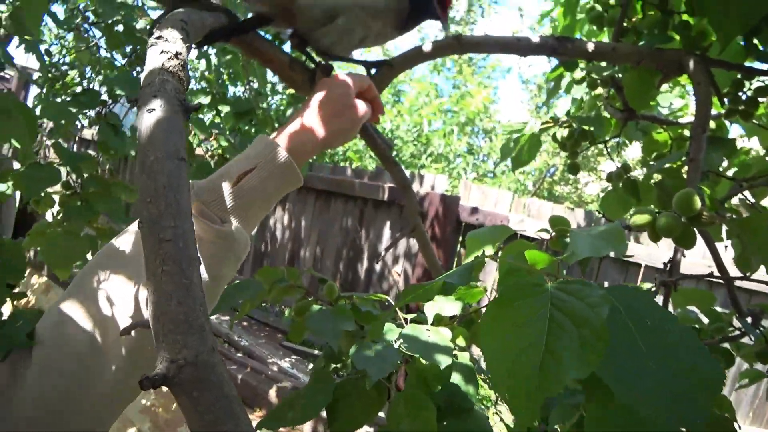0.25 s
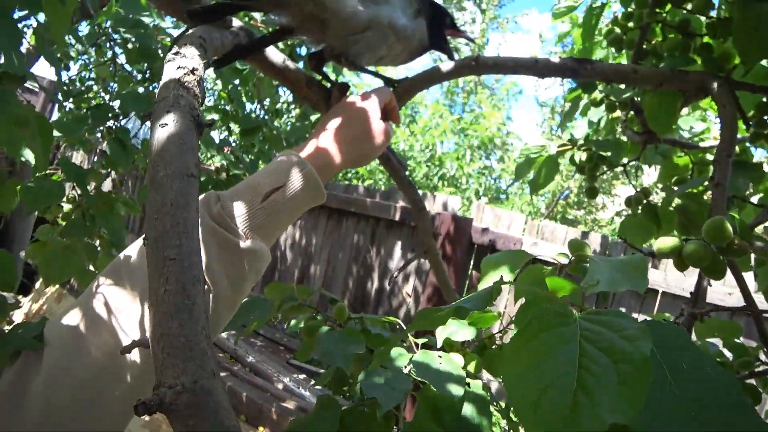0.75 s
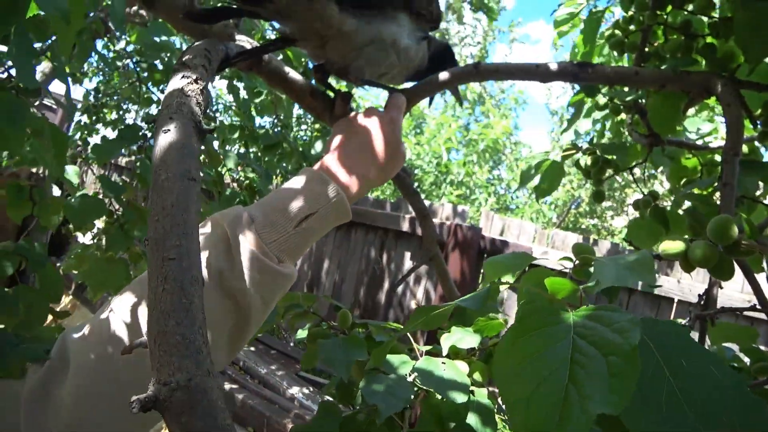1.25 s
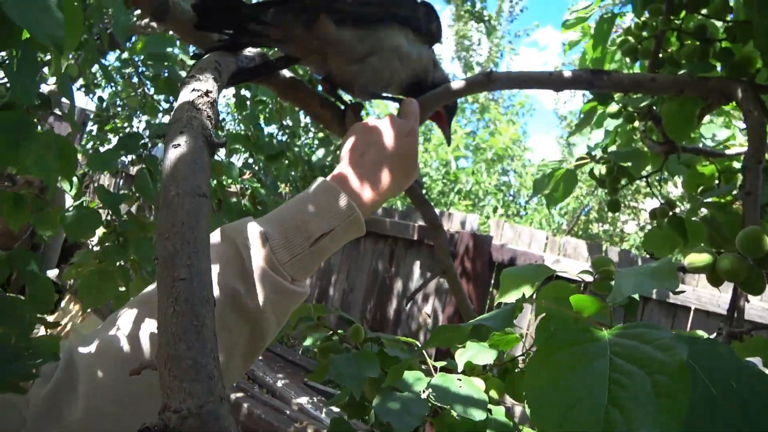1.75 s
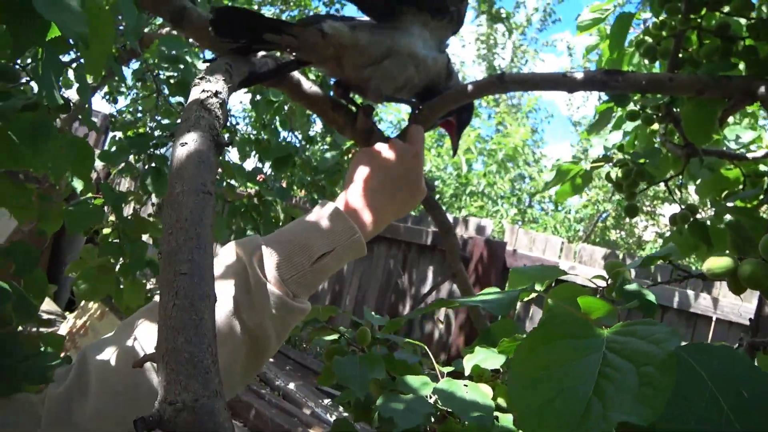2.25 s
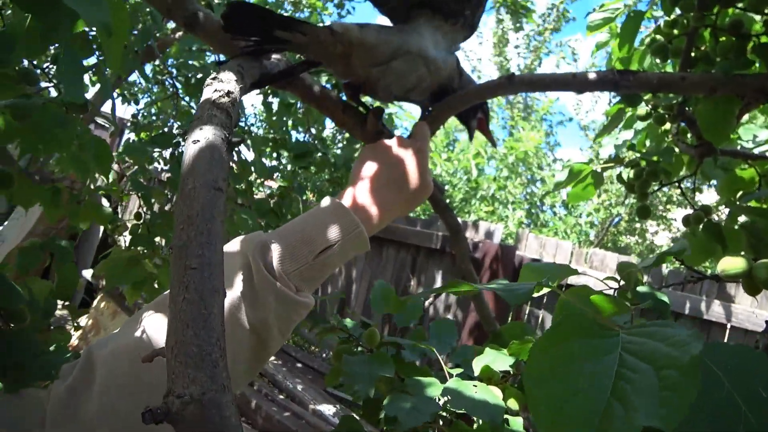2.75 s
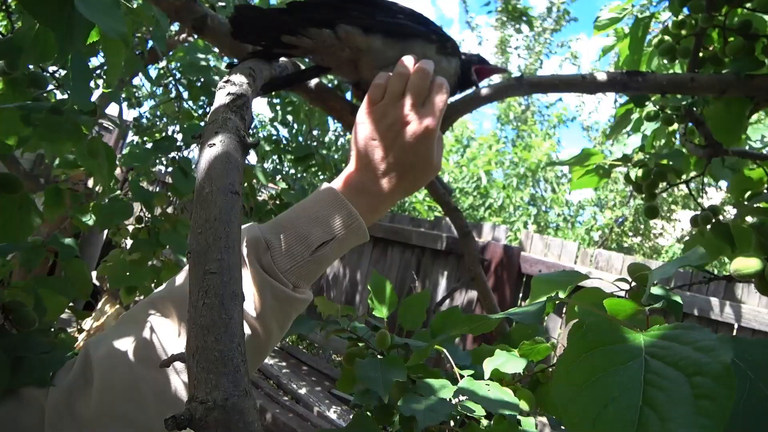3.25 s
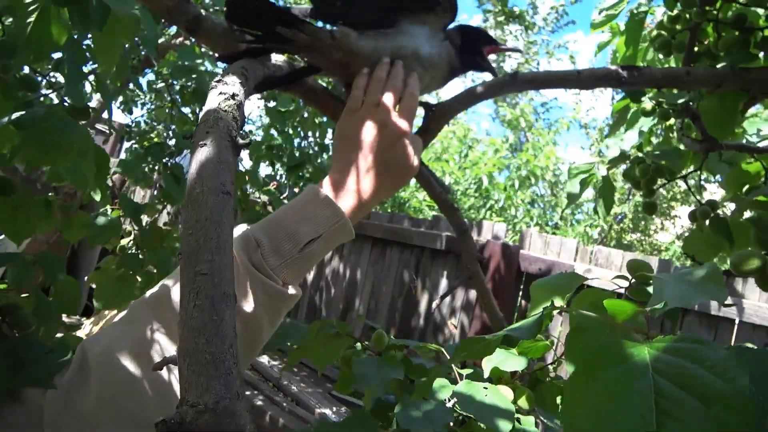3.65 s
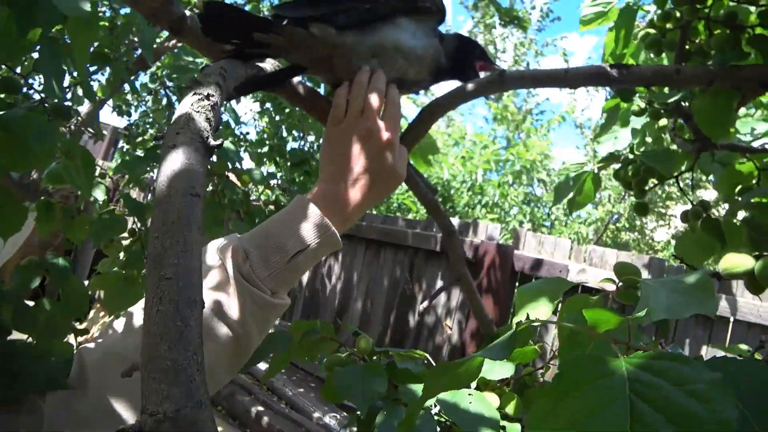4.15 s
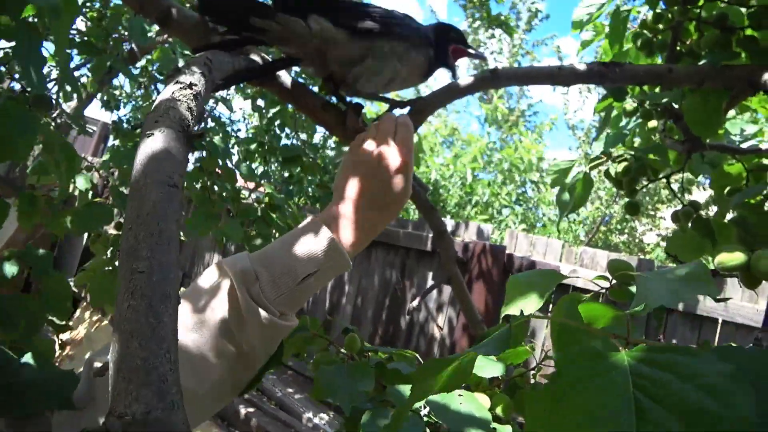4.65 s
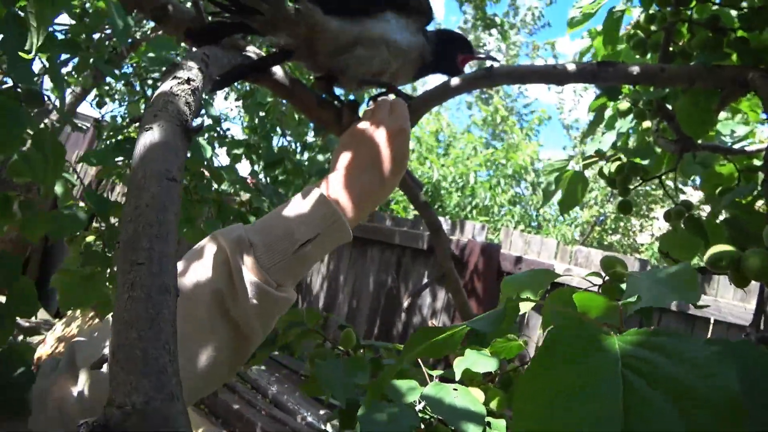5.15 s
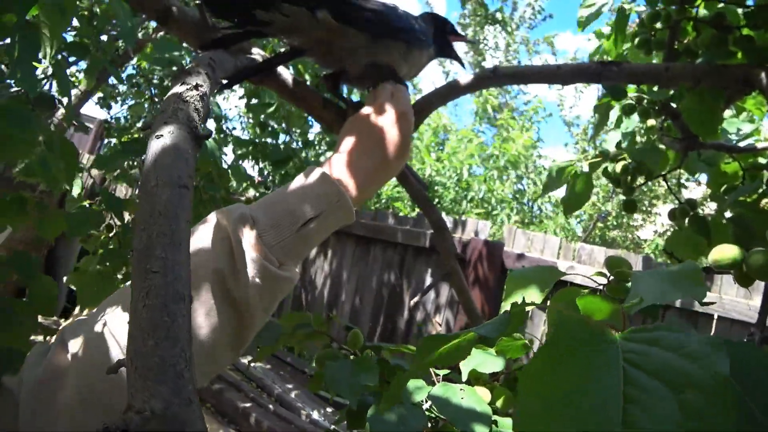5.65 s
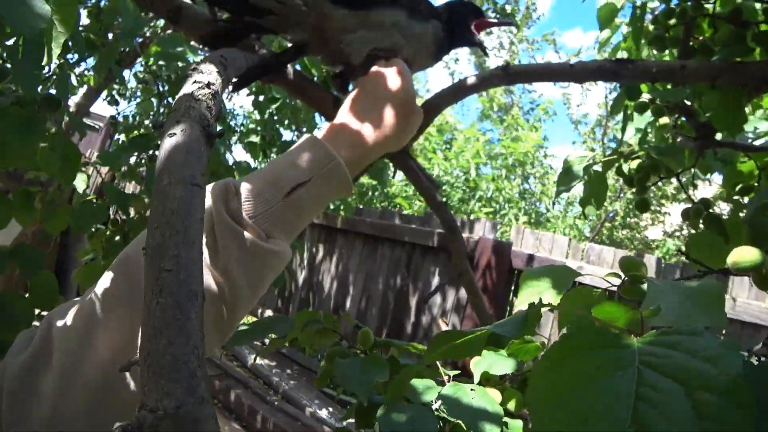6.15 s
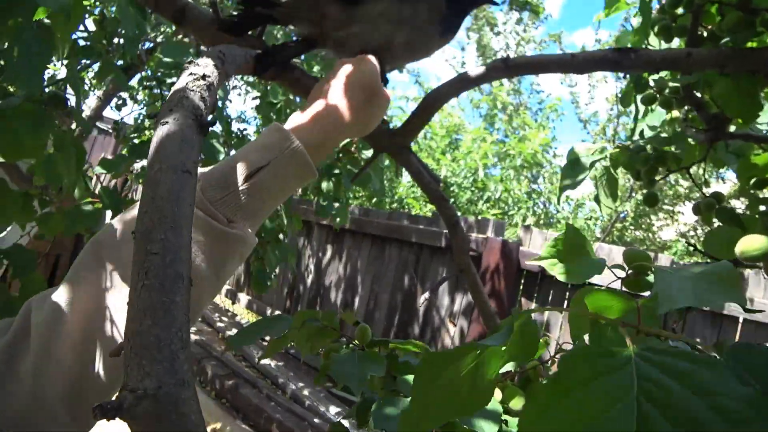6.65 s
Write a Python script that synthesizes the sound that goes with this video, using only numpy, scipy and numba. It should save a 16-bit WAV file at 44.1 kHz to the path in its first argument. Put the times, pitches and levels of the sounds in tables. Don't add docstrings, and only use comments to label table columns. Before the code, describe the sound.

A quiet leafy yard with a low distant town hum and faint leaf hiss; the tail of an earlier caw still rings at the start, with small twig ticks. A young crow about two metres away, slightly right, caws loudly at roughly 0.2, 1.0, 1.8, 2.6, 3.4, 4.2, 5.0 and 6.0 seconds, each lasting about 0.4 seconds. Every caw is harsh, rough and buzzing, with a quick onset, a held nasal rasp around 400 Hz and bright upper tones, then a brief pitch sag and crackling stop. Brightness varies from call to call. Short echoes from branches and fence follow, and the background dips under each caw. Leaves rustle near 0.8 to 1.0 and 1.5 seconds, with a stronger wind bump at 1.5. After the last caw ends at 6.4, quick wind puffs and a sharper cluster of rustling twigs and leaves run from 6.6 to the end, near 7.

```python
import sys
import numpy as np
from scipy import signal
from scipy.fft import rfft, irfft
from scipy.io import wavfile
from scipy.ndimage import uniform_filter1d
from numba import njit

SR = 44100
rng = np.random.default_rng(int(sys.argv[2]) if len(sys.argv) > 2 else 0)


def pcm_store(signal):
    levels = np.round(np.clip(np.atleast_2d(signal), -1, 1) * 32767)
    wavfile.write(sys.argv[1], SR, levels.astype(np.int16).T)


def how_loud(loudness_db):
    steps = np.asarray(loudness_db, float) / 20
    return 10 ** steps


N = 304528
T = np.arange(N) / SR

# (start [s], end [s])
CAW_SPANS = [
    (.235, .64),
    (1.0264, 1.435),
    (1.8362, 2.3),
    (2.6391, 3.035),
    (3.4086, 3.835),
    (4.1952, 4.615),
    (5.041, 5.485),
    (5.9896, 6.4),
]
# (release begins [s], held pulse rate [Hz], last pulse rate [Hz], sag time [s])
CAW_PITCHES = [(.598, 414.3, 324.8, 0.087), (1.395, 408.1, 309.9, 0.079), (2.264, 402.7, 338.1, 0.068),
               (2.993, 409, 310.5, 0.056), (3.797, 407, 330.1, .055), (4.572, 407, 325, .1),
               (5.447, 407.1, 336.6, 0.078), (6.36, 396.9, 304, 0.083)]
EFFORT = [(-19.5, -24.5, -18.5, -19, -19.5), (-18.5, -18.5, -18.5, -20.5, -21.5),
          (-17, -22, -21.5, -22.5, -21.5), (-18, -20.5, -20, -19.5, -19.5), (-19.5, -22.5, -20, -18, -19.5),
          (-18, -18, -18.5, -19, -20.5), (-18, -21, -20, -18.5, -21.5), (-17.5, -19, -19.5, -20, -22)]
GAPE = [(0.24, 0.31, 0.47, 0.63, 0.58), (.02, .08, .5, 1, .92), (0.4, 0.29, 0.33, .42, 0.4),
        (0.1, .02, .04, 0.25, 0.56), (0.11, .1, 0.26, 0.36, 0.35), (0.076, 0.2, 0.48, 0.62, 0.55),
        (0.48, 0.28, 0.35, 0.48, 0.48), (0.13, 0.17, 0.34, 0.55, 0.58)]
FACING = [(10.5, 10.5, 1, 1.5, -1), (-7, -4, -2, -0.5, 3.5), (4.5, 7, 9.5, 10, 8), (2, 3.5, 6, 6.5, 2),
          (7, 8.5, 4, -4.5, 0.5), (-4.5, -2, -3.5, 0.5, -2), (3.5, 1.5, -1, -6, -4),
          (-6, -1.5, 0.5, 4, 6.5)]
# (third resonance [Hz], fourth resonance at onset [Hz], fourth resonance at release [Hz])
NECK = [(6550, 7860, 7830), (6590, 7300, 8180), (6470, 7830, 7980), (6350, 8300, 7980), (6330, 7610, 8270),
        (6527, 8270, 7940), (6460, 7640, 7810), (6380, 7930, 7870)]
PULL = ((.11, .12), (.05, .85))
# (frequency [Hz], level [dB])
CLICK_COLOUR = [(150, -50.5), (260, -10), (420, -2.5), (650, 0.5), (1000, 2), (3000, -2), (6000, 5),
                (11000, 1)]
# (width [Hz], lift [dB])
MOVING_RESONANCES = [(950, 18), (900, 12.5), (1100, 11), (900, 8)]
# (frequency [Hz], width [Hz], lift [dB])
STEADY_RESONANCES = [(1166, 190, 4.6), (1750, 510, 6), (2550, 2400, 5.3), (5760, 970, 3.7),
                     (7130, 340, 9.9), (8980, 2400, 6), (10580, 930, 7.1)]
# (which resonance [index], offset [Hz],
# width [Hz], lift [dB])
MOVING_GAPS = [(2, 720, 140, -9), (3, 1200, 180, -11)]
# (beak shut [Hz], beak wide [Hz])
FIRST_HZ = (1994, 2292)
SECOND_HZ = (3654, 5440)
SPLIT_HZ = (3200, 5500, 8900)
# (level against the bass [dB], share of the facing, extra at onset [dB], extra at release [dB])
BEAM = [(-11.5, 0.083, -13.5, -7), (-6, 0.31, -2.5, -1.5), (-16, 1., -12, -9.5)]
# (frequency [Hz], left minus right [dB])
SIDE_DIFFERENCE = [(150, -.3), (500, -3), (1100, -5), (4000, -6), (8000, -4.5), (11000, -3)]
# (frequency [Hz], time to fade by 60 dB [s])
YARD_FADE = [(500, 0.46), (1100, 0.49), (2100, 0.4), (4200, 0.4), (8000, 0.13)]
# (frequency [Hz], level per Hz [dB])
TOWN_COLOUR = [(15, -31), (25, -12), (239, -11.5), (317, -9.5), (399, -13), (490, -12), (543, -15.5),
               (840, -13), (2280, -25.5), (3630, -24.5), (5900, -26.5), (10600, -33), (11500, -47),
               (15000, -88.5), (22000, -120)]
# (time [s], peak level [dB], rise [s], fall [s])
GUSTS = [
    (.17, -54, 0.072, .04),
    (1.53, -35, .01, 0.073),
    (4.63, -53, .02, 0.032),
    (6.445, -37, 0.016, .015),
    (6.72, -47, 0.0087, .012),
    (6.752, -37, .01, .012),
    (6.8, -43, .02, .06),
]
# (time [s], peak level [dB], rise [s], fall [s])
STIRS = [
    (.15, -46, 0.16, 0.11),
    (.78, -55, 0.06, .08),
    (.99, -45, .03, 0.11),
    (5.93, -68, 0.071, .05),
    (6.47, -52, 0.027, 0.023),
    (6.85, -42, 0.092, .2),
]
# (time [s], peak level [dB], colour [Hz], length [s])
RUSTLES = [(0.059, -34.5, 5030, 0.0093), (0.1494, -31.5, 6380, 0.0032), (0.837, -40, 4110, 0.0096),
           (0.847, -32.5, 6750, 0.018), (0.887, -34, 6400, 0.0098), (0.966, -44, 9620, 0.008),
           (1.456, -34, 5880, 0.008), (1.484, -34, 5080, 0.0069), (1.4994, -44, 5250, 0.0061),
           (1.5994, -55, 4950, 0.0072), (1.6397, -34.5, 4750, 0.0066), (4.7594, -39, 5700, 0.0064),
           (5.624, -36.5, 4101, 0.0085), (5.713, -39, 4630, 0.0087), (6.619, -23.5, 4900, 0.01),
           (6.665, -36.5, 5710, 0.011), (6.721, -36.5, 5350, 0.028), (6.748, -35, 5760, 0.022),
           (6.773, -30, 8480, 0.023), (6.778, -30, 5520, 0.019), (6.877, -34, 6280, 0.0089)]

RATIO_HELD, RATIO_LAST, RATIO_WANDER, SLIP_S = .75, .69, .01, .11
LOCK_HZ, LOCK_PHASE = 3., -.1
ROUGH_ATTACK, ROUGH_HELD, ROUGH_LAST = .5, .22, .5
ATTACK_S, ATTACK_DB, ATTACK_PITCH, ATTACK_GAPE = .012, -2, .83, 0.28
RELEASE_DB_PER_S, RELEASE_DULL_S, STOP_S, COLLAPSE_S = -450, 0.02, 0.029, .045
THIRD_SAG_HZ = 200
TOWN_DB, LEAF_DB = -46.5, -57.5
WIND_DB, WIND_DUCK_DB, WIND_SWELL_DB = -54, -5, 1
DUCK_DB, DUCK_RELEASE_S = -8, .05
TOP_HZ = 11050


def colour(x, points):
    hz, db = np.transpose(points)
    grid_hz = np.arange(1, 1026) * SR / 2048
    log_gain = np.interp(np.log(grid_hz), np.log(hz), db) * np.log(10) / 20
    cepstrum = irfft(log_gain)
    cepstrum[1:1024] *= 2
    cepstrum[1025:] = 0
    return signal.fftconvolve(x, irfft(np.exp(rfft(cepstrum))))[:len(x)]


def unit(x):
    return x / np.sqrt(np.mean(x ** 2))


def walk(rate):
    k = int(SR / rate)
    held = np.repeat(rng.standard_normal(N // k + 1), k)
    return 1.3 * uniform_filter1d(uniform_filter1d(held, k), k)[:N]


def swells(rows):
    total = 0
    for s, db, rise, fall in rows:
        length = np.where(T < s, max(rise, .005), max(fall, .005))
        total = total + how_loud(db) * np.exp(-np.abs(T - s) / length)
    return total


@njit
def band(x, hz, width):
    y, b, l = np.empty(len(x)), 0., 0.
    for i in range(len(x)):
        g, k = np.tan(np.pi * hz[i] / SR), width / hz[i]
        v = (b + g * (x[i] - l)) / (1 + g * (g + k))
        b, l, y[i] = 2 * v - b, l + 2 * g * v, k * v
    return y


def pair(points, alike_hz):
    mid, side = (colour(rng.standard_normal(N), points) for _ in range(2))
    side = signal.sosfilt(signal.butter(1, alike_hz, "high", fs=SR, output="sos"), side)
    return unit(np.array([mid + side, mid - side]))


def town():
    noise, out = pair(TOWN_COLOUR, alike_hz=550), 0
    edges = [110, 180, 300, 700, 1600, 3500, 7000, 12000]
    swell = walk(1.0)
    for lo, hi in zip(edges, edges[1:]):
        part = signal.sosfiltfilt(signal.butter(2, (lo, hi), "band", fs=SR, output="sos"), noise)
        out = out + part * how_loud(.6 * swell + 1.1 * walk(9))
    return unit(out) * how_loud(TOWN_DB - 2.5)


def wind(sounding):
    bumps = pair([(15, 3), (30, -0.5), (72, -2.0), (110, -5.0), (200, -19.5), (400, -30), (900, -54)],
                 alike_hz=610)
    duck_db = WIND_DUCK_DB * uniform_filter1d(sounding, size=2000)
    breeze = how_loud(WIND_DB + WIND_SWELL_DB * walk(6.7) + duck_db)
    return bumps * (breeze + swells(GUSTS)) * how_loud(-1.5 + 1.5 * walk(25))


def leaves():
    grains = how_loud(2.0 * rng.exponential(size=(2, N))) * rng.standard_normal((2, N))
    hiss_colour = [(1500, -10), (4000, -10), (8000, -13.0), (11000, -6.0)]
    hiss = np.array([colour(g, hiss_colour) for g in grains])
    out = unit(hiss) * (how_loud(LEAF_DB) + swells(STIRS)) * how_loud(-5)
    t = T[:4000]
    for s, db, hz, length in RUSTLES:
        mid, side = rng.standard_normal((2, len(t)))
        centre = np.full(len(t), 1. * hz)
        burst = np.array([band(v, centre, 4400.0) for v in (mid + .5 * side, mid - .5 * side)])
        fade = np.minimum(t / .004, 1) * np.exp(-t / max(length, .002))
        burst = how_loud(db - 3) * burst * fade
        i = int(s * SR)
        out[:, i:i + len(t)] += burst[:, :N - i]
    return out


def yard(voice):
    t = T[:SR // 2]
    out = []
    for _ in range(2):
        tail = 0
        for f, t60 in YARD_FADE:
            ring = band(rng.standard_normal(len(t)), np.full(len(t), 1. * f), 0.82 * f)
            tail = tail + ring * how_loud(-60 * t / t60) / np.sqrt(f)
        tail = how_loud(-22.0) * tail * np.minimum(t / 0.028, 1) / np.linalg.norm(tail)
        out.append(signal.fftconvolve(voice, tail)[:N])
    out = np.array(out)
    late = int(.66 * SR)
    out[:, :SR // 4] += how_loud(-2.0) * out[:, late:late + SR // 4]
    return out


def caw(k, t):
    start, _ = CAW_SPANS[k]
    release, held_hz, last_hz, sag_s = CAW_PITCHES[k]
    moments = np.linspace(start, release, 5)
    effort_db, gape, facing_db = (np.interp(t, moments, table[k]) for table in (EFFORT, GAPE, FACING))
    onset = np.exp(-np.maximum(t - start, 0) / ATTACK_S)
    after = np.clip(t - release, 0, .06)
    sag, slip, dull = (np.exp(np.minimum(t - release, .02) / tau) for tau in (sag_s, SLIP_S, RELEASE_DULL_S))
    hz = held_hz * (1 - (1 - ATTACK_PITCH) * onset) - (held_hz - last_hz) * sag
    hz = hz * np.exp(-after / COLLAPSE_S)
    ratio = RATIO_HELD + (RATIO_LAST - RATIO_HELD) * slip
    rough = ROUGH_HELD + (ROUGH_ATTACK - ROUGH_HELD) * onset + (ROUGH_LAST - ROUGH_HELD) * sag
    db = effort_db + ATTACK_DB * onset + RELEASE_DB_PER_S * after - 10 * (after / STOP_S) ** 4
    beams = [level_db + share * facing_db + first_db * onset + last_db * dull
             for level_db, share, first_db, last_db in BEAM]
    gape = gape + ATTACK_GAPE * onset
    third_hz, *fourth_hz = NECK[k]
    throat = [shut + (wide - shut) * gape for shut, wide in (FIRST_HZ, SECOND_HZ)]
    throat += [third_hz - THIRD_SAG_HZ * sag, np.interp(t, (start, release), fourth_hz)]
    return np.array([hz, ratio, rough, db, *beams, *throat])


@njit
def phases(fast_hz, slow_hz, start, lock_hz, lock_phase):
    out, a, b = np.empty((2, len(fast_hz))), 0., 0.
    for i in range(len(fast_hz)):
        if start[i] > 0:
            a, b = np.ceil(a) + .85, np.ceil(b) + .2
        a += fast_hz[i] / SR
        b += (slow_hz[i] - lock_hz * np.sin(2 * np.pi * (4 * b - 3 * a - lock_phase))) / SR
        out[0, i], out[1, i] = a, b
    return out


def pulled(own, other, pull):
    late, at = pull
    return own - late * np.cos(2 * np.pi * (other - at))


def clicks(phase, other, rough, scatter_db, jitter_s):
    i = np.flatnonzero(np.diff(np.maximum.accumulate(np.floor(phase))) > 0)
    time_chance, size_chance = rng.standard_normal((2, len(i)))
    at = i + (np.ceil(phase[i]) - phase[i]) / (phase[i + 1] - phase[i])
    at = at + time_chance * rough[i] * jitter_s * SR
    taps = np.floor(at)[:, None] + np.arange(-7, 9)
    away = taps - at[:, None]
    shape = np.sinc(away) * np.cos(away * np.pi / 16) ** 2
    size = how_loud(scatter_db * np.clip(size_chance, -2, 2) * (rough[i] + 0.08))
    apart = (other[i] + .5) % 1 - .5
    size = size * (1 - .45 * np.exp(-apart ** 2 / .006))
    places = np.clip(taps, 0, N - 1).astype(int)
    return np.bincount(places.ravel(), (shape * size[:, None]).ravel(), N)


def throat(x, moving_hz):
    modes = [(f, w, g) for f, (w, g) in zip(moving_hz, MOVING_RESONANCES)]
    modes += [(np.full(N, 1. * f), w, g) for f, w, g in STEADY_RESONANCES]
    modes += [(moving_hz[k] + off + 120 * walk(5), w, g) for k, off, w, g in MOVING_GAPS]
    for f, width, lift_db in modes:
        x = x + (how_loud(lift_db) - 1) * band(x, f, 1. * width / np.sqrt(how_loud(lift_db)))
    return x


def crow(sounding):
    turns = np.split(T, [int((a - .1) * SR) for a, b in CAW_SPANS[1:]])
    hz, ratio, rough, db, *rows = np.hstack([caw(k, t) for k, t in enumerate(turns)])
    beams_db, moving_hz = rows[:3], rows[3:]
    ratio = ratio + RATIO_WANDER * walk(15)
    start = np.diff(sounding, prepend=0)
    fast_hz = hz * (1 + .02 * rough * walk(60))
    slow_hz = hz * ratio * (1 + .025 * rough * walk(60))
    free_fast, free_slow = phases(fast_hz, slow_hz, start, LOCK_HZ, LOCK_PHASE)
    fast, slow = pulled(free_fast, free_slow, PULL[0]), pulled(free_slow, free_fast, PULL[1])
    fast_clicks = clicks(fast, slow, rough, scatter_db=2, jitter_s=.00009)
    slow_clicks = clicks(slow, fast, rough, scatter_db=2.5, jitter_s=.00009)
    pulses = unit(fast_clicks + slow_clicks)
    gate = .25 + np.exp(-(fast % 1) / .4) + np.exp(-(slow % 1) / .4)
    gate = gate * signal.lfilter([.001], [1, -.999], sounding)
    air = unit(colour(gate * rng.standard_normal(N), [(300, 7), (900, 5), (1600, 0), (5000, 0)]))
    source = how_loud(-8) * (.6 + rough) * air - pulses
    swell = .45 + .55 * signal.lfilter([.006], [1, -.994], sounding)
    x = throat(colour(source * sounding * swell * how_loud(db), CLICK_COLOUR), moving_hz)
    lows = [signal.sosfiltfilt(signal.butter(3, f, fs=SR, output="sos"), x) for f in SPLIT_HZ]
    parts = np.diff([0 * x, *lows, x], axis=0)
    strength = np.mean((sounding * how_loud(db)) ** 2) ** .5
    return strength * sum(unit(p) * how_loud(g) for p, g in zip(parts, [0, *beams_db]))


def branches(voice):
    t = T[:1200]
    out = np.zeros((2, N))
    step = 7000
    for a, b in CAW_SPANS:
        for i in range(int(a * SR) - step, int(b * SR), step):
            piece = voice[i:i + 2 * step] * np.hanning(2 * step)
            both, *own = rng.standard_normal((3, len(t))) * how_loud(-60 * t / .018) * (t > .0005)
            near = 1.3 * both + np.array(own) + .7 * np.diff(own, prepend=0)
            near = near / np.linalg.norm(near, axis=1)[:, None]
            echo = signal.fftconvolve(piece[None], near, axes=1)
            out[:, i:i + echo.shape[1]] += echo
    return voice + how_loud(-7.5) * out


def scene():
    sounding = sum(1. * (T > a) * (T < b) for a, b in CAW_SPANS)
    voice = crow(sounding)
    direct = np.array([colour(v, np.array(SIDE_DIFFERENCE) * [1, side])
                       for v, side in zip(branches(voice), (.5, -.5))])
    keep = np.exp(-1 / (DUCK_RELEASE_S * SR))
    recovering = signal.lfilter([1 - keep], [1, -keep], sounding)
    duck = how_loud(DUCK_DB * np.maximum(sounding, recovering))
    return direct + yard(voice) + duck * town() + wind(sounding) + leaves()


def band_limit(x):
    return signal.sosfilt(signal.butter(12, 12240, fs=SR, output="sos"), x)


def record(dry):
    rounded = np.tanh(dry)
    top_cut = signal.ellip(8, .2, 36, TOP_HZ, fs=SR, output="sos")
    mix = signal.sosfiltfilt(top_cut, rounded)
    return band_limit(mix)


dry = scene()
out = record(dry)
pcm_store(out)
```